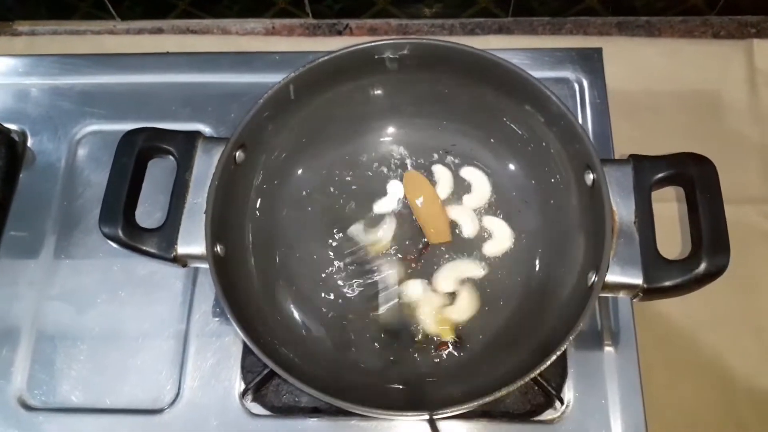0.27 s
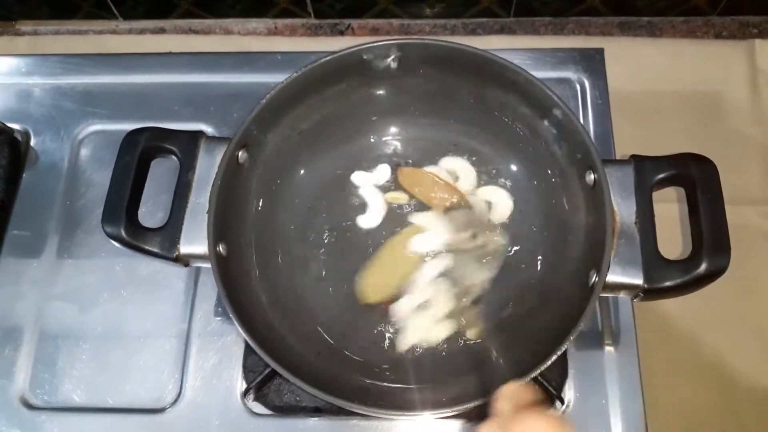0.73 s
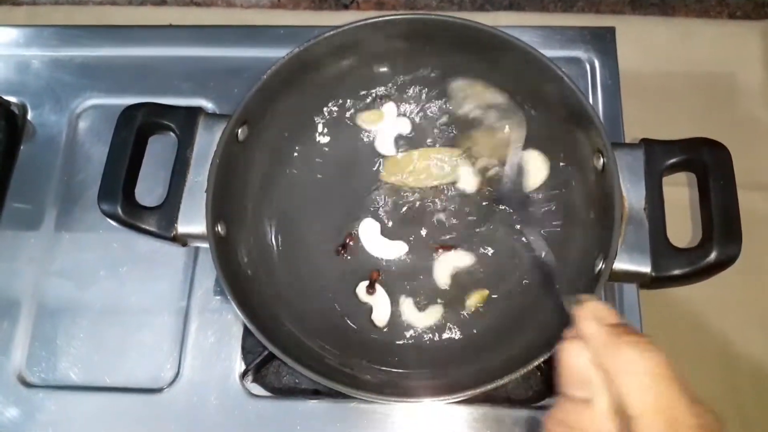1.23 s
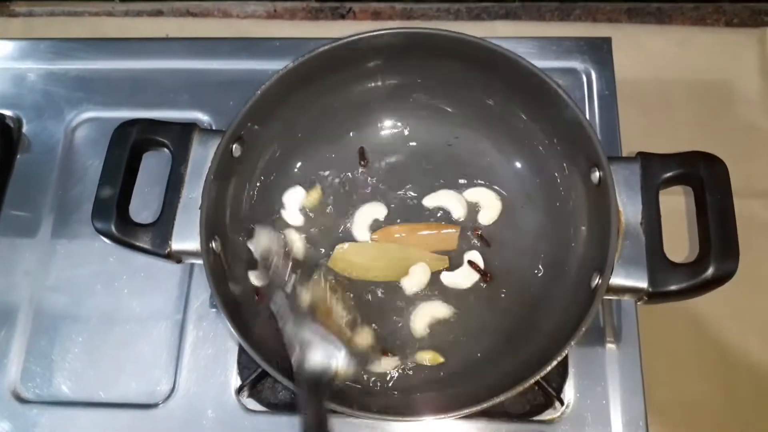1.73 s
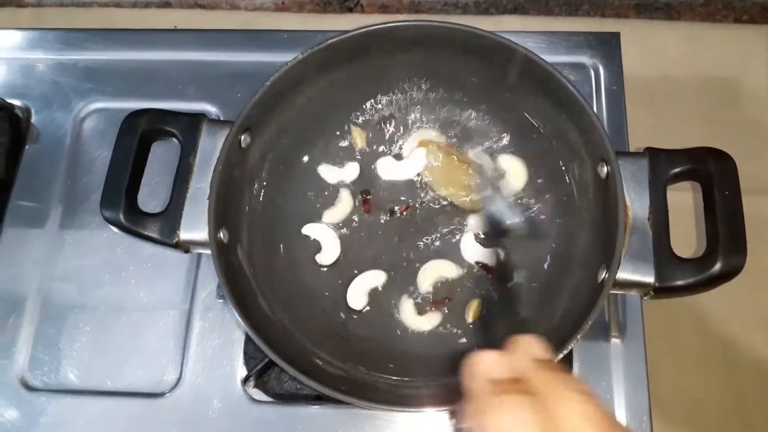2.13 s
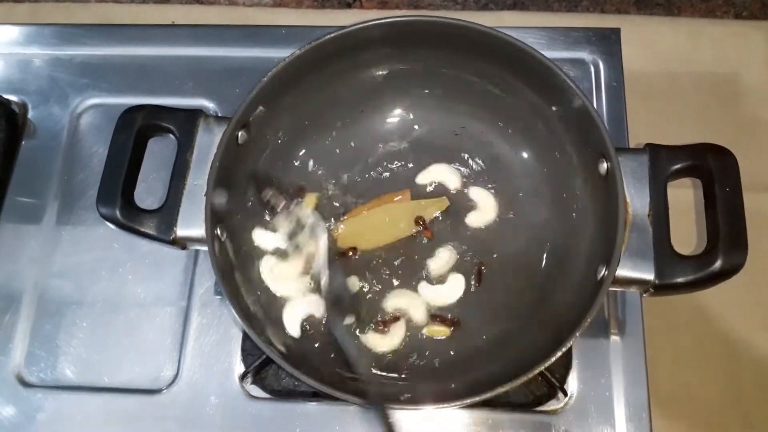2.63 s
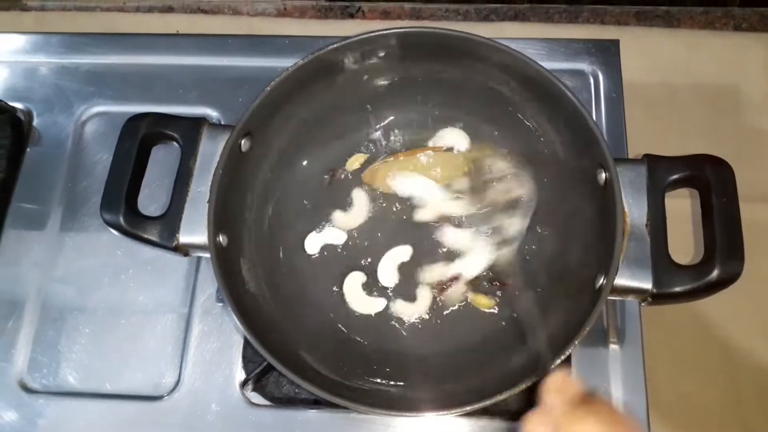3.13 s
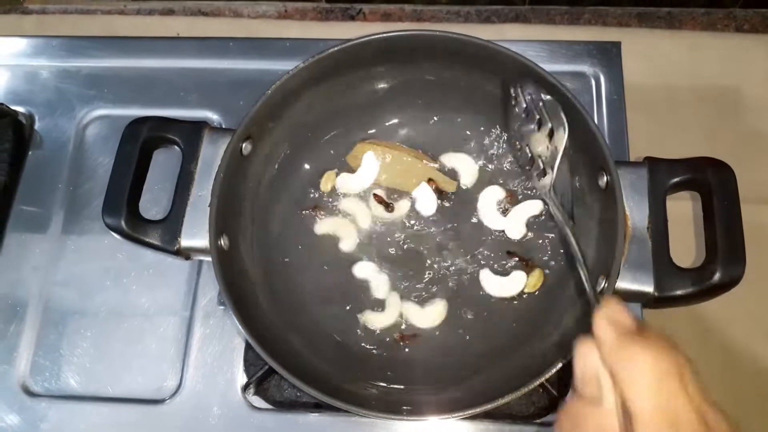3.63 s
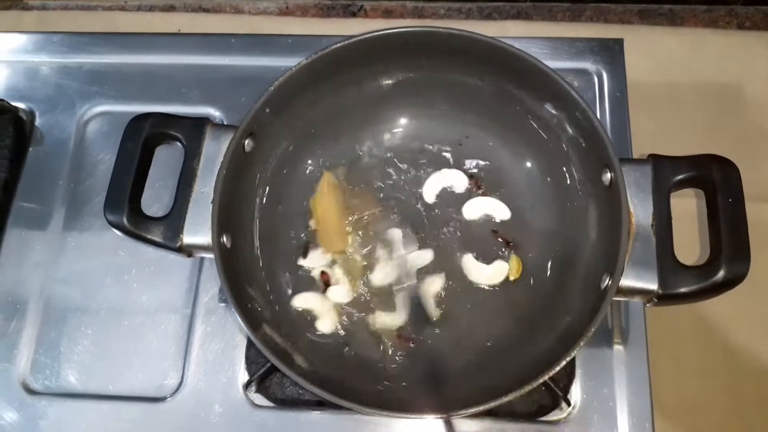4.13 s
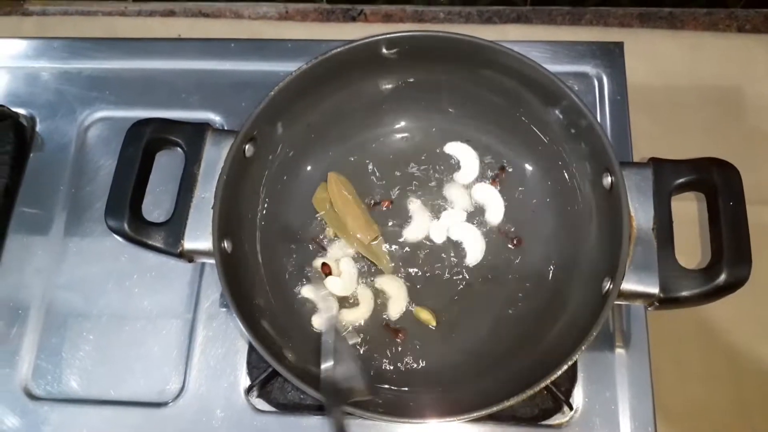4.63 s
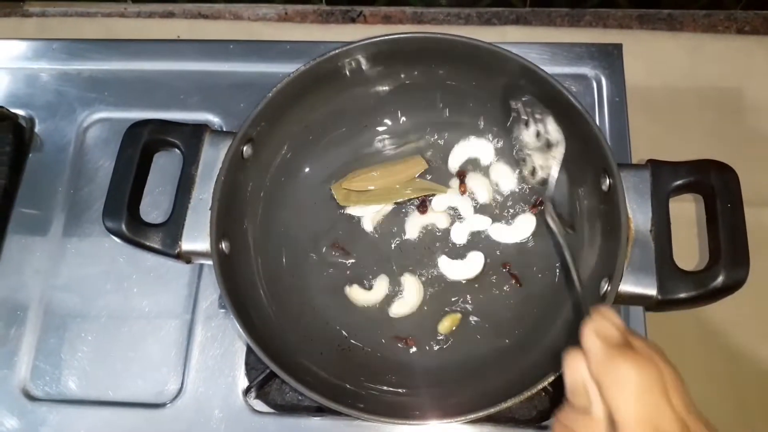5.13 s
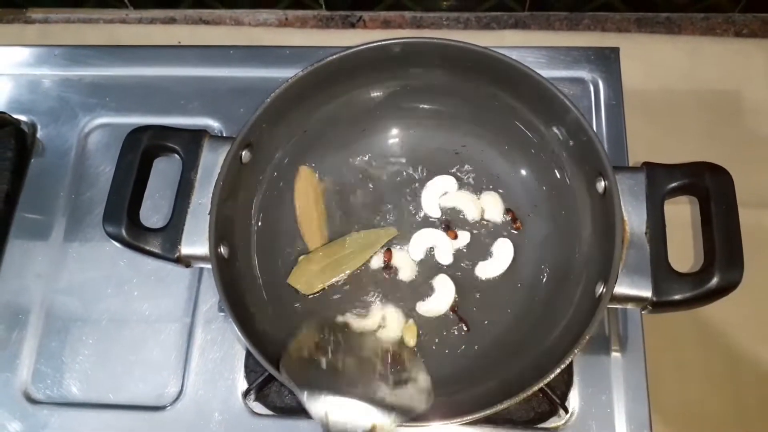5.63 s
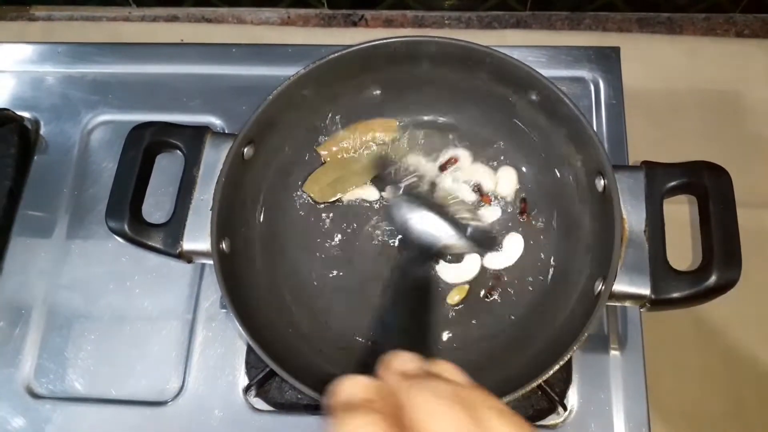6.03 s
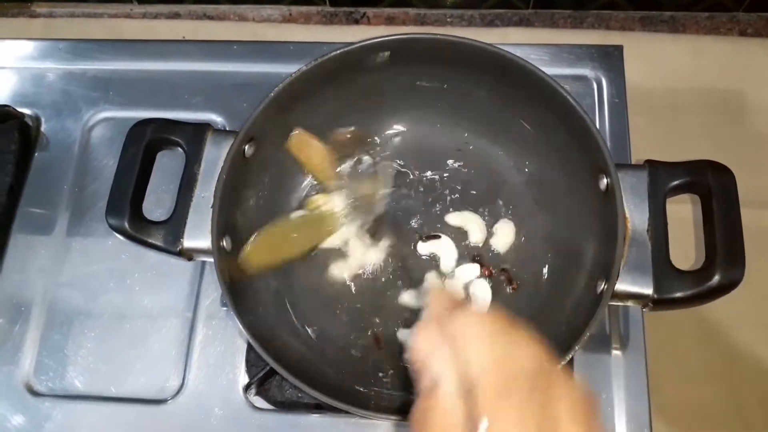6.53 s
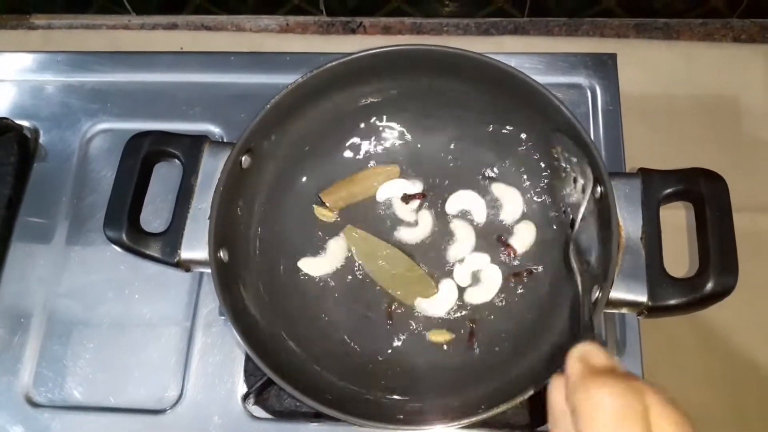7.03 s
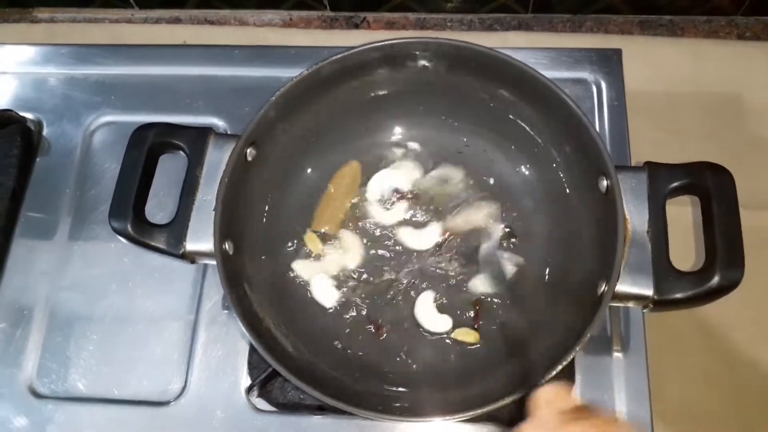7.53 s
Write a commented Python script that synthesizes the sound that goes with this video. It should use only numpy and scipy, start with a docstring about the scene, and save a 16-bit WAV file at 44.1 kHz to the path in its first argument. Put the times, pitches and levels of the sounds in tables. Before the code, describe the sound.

Close up in a kitchen with a short echo, hot oil crackles and spits in a metal pan of nuts and spices. From the start, a steel spatula clinks and clatters irregularly against the pan, sliding with a faint low hum and making the frying surge. A few short rasping scrapes join from about three seconds on. Everything is heard on the right, with the left almost silent.

```python
"""In a hard-walled kitchen, cashews and whole spices fry in a film of hot oil in a metal pan.
Bursting steam bubbles ring as damped resonators: short pitched pops over a fine fizz. Now and then
a drop spits with a sharp crack. A steel spatula stirs: its impacts excite the normal modes of pan
and blade, its friction makes them rasp and hum, and each push makes the boiling flare up.
All this sounds in the right channel; the left carries only faint electronic hiss."""
import sys
import numpy as np
from scipy import signal
from scipy.fft import rfft, irfft, next_fast_len
from scipy.io import wavfile
from scipy.ndimage import uniform_filter1d, map_coordinates

SR = 44100
rng = np.random.default_rng(int(sys.argv[2]) if len(sys.argv) > 2 else 0)


def int16_out(signal):
    """Quantize to a 16-bit WAV file."""
    q = np.round(np.clip(np.atleast_2d(signal).T, -1, 1) * 32767)
    wavfile.write(sys.argv[1], SR, q.astype(np.int16))


N = 342657


def amp(db):
    """Amplitude ratio of a level in decibels."""
    return 10 ** (np.asarray(db) / 20)


def unit(x):
    """Normalisation to rms 1."""
    return x / np.sqrt(np.mean(x ** 2) + 1e-20)


def along(points, hz):
    """Interpolation of (frequency, value) points on a logarithmic frequency axis."""
    freqs, values = np.transpose(points)
    return np.interp(np.log(hz + 1), np.log(freqs + 1), values)


def wobble(rate):
    """Smooth random modulation: a spline through `rate` random values a second."""
    return map_coordinates(rng.standard_normal(int(N * rate / SR) + 4), [np.arange(N) * rate / SR])


def swell(start, hold, rise, fall):
    """Exponential growth to 1 at `start`, a plateau, then exponential decay."""
    t = np.arange(N) / SR - start
    return np.exp(np.minimum(t, 0) / rise - np.maximum(t - hold, 0) / fall)


def filtered(x, response):
    """Linear filtering: the spectrum of x times a frequency response."""
    size = next_fast_len(len(x) + 8192)
    return irfft(rfft(x, size) * response(np.fft.rfftfreq(size, 1 / SR)), size)[:len(x)]


def coloured(x, spectrum):
    """Spectral shaping by (frequency [Hz], level [dB]) points; rms 1."""
    return unit(filtered(x, lambda hz: amp(along(spectrum, hz))))


def dying_noise(spectrum, t60s):
    """Dense modes decay like noise, each frequency at its own rate; half a second, energy 1."""
    hz, t, spectrogram = signal.stft(rng.standard_normal(SR // 2), SR, nperseg=256)
    gain = amp(along(spectrum, hz)[:, None] - 60 * t / along(t60s, hz)[:, None])
    tail = signal.istft(spectrogram * gain, SR, nperseg=256)[1][:SR // 2]
    return tail / np.linalg.norm(tail)


def add(track, time, sound):
    """Superposition of a sound on the track at a time in seconds."""
    start = int(np.clip(round(time * SR), 0, N))
    track[start:start + len(sound)] += sound[:N - start]


def electronic_hiss():
    """Electronic noise: a faint, steady broadband floor."""
    spectrum = [(20, -3), (90, 6), (1000, -1), (5500, -4), (9000, -12), (13000, -4), (15500, -6)]
    return amp(-82) * coloured(rng.standard_normal(N), spectrum)


# Spectrum of the kitchen air: (frequency [Hz], relative level [dB])
AIR_SPECTRUM = [(25, 1), (80, 6), (170, 3), (600, 9.5), (2000, -9), (8000, 12), (15800, -20)]
def kitchen_air():
    """Ambient noise: a stationary hush."""
    return amp(-62) * coloured(rng.standard_normal(N), AIR_SPECTRUM)


# Reflections from the pan wall and two tiled walls: (delay [s], gain [dB])
REFLECTIONS = [(.0013, -8.5), (0.0129, -17), (0.0168, -19)]
# Spectrum of the diffuse tail: (frequency [Hz], relative level [dB])
TAIL_SPECTRUM = [(200, -2.5), (1500, 1.5), (3000, 4), (6000, -6.5), (14000, 5)]
# Reverberation time: (frequency [Hz], T60 [s])
TAIL_T60 = [(200, 0.13), (1500, 0.29), (6000, 0.25), (14000, 0.19)]
def reverberation(x):
    """Reflection: three short echoes sound along with a diffuse tail, drawn anew each quarter second."""
    out, step = np.zeros(N), SR // 4
    for delay, db in REFLECTIONS:
        add(out, delay, amp(db) * x)
    for start in range(0, N, step):
        tail = signal.fftconvolve(x[start:start + step], dying_noise(TAIL_SPECTRUM, TAIL_T60))
        add(out, start / SR + 0.002, tail)
    return out


# Normal modes of pan and spatula together: (frequency [Hz], relative level [dB], T60 [s])
METAL_MODES = [(171, -19, .5), (240, -6.5, .4), (275, 3.5, .47), (351, -1, .46), (470, -5, .15),
               (726, -7, .34), (828, 4, .18), (850, 7, .083), (966, -2, .28), (1545, -2, .43),
               (1658, -7, .63), (2330, -7, .42), (2400, -4.5, .36), (2600, -7, .3), (3167, -5, .47),
               (4105, -3, .34), (4950, -4, .25), (5510, -2, .35), (5935, 5, .34), (5985, -1, .37),
               (6402, 1, .42), (7040, -6, .43), (7110, 1, .32), (7690, -6.5, .53), (7811, -2, .42),
               (11238, -11, .3), (11717, -14, .25), (12400, -17, .22), (13000, -15, .25), (14646, -11, .23)]
def free_vibration(db, t, blur_hz=3, blur_share=0.0019, load_share=0.00177):
    """Damped modes ring at levels `db`; loading by the moving blade detunes them and makes them drift."""
    hz, _, t60 = np.transpose(METAL_MODES)[:, :, None]
    hz = hz * (1 + load_share * rng.standard_normal(hz.shape))
    linewidth = np.abs(blur_hz + blur_share * hz)
    phase_steps = rng.standard_normal((len(hz), len(t))) * np.sqrt(2 * np.pi * linewidth / SR)
    drift = uniform_filter1d(np.cumsum(phase_steps, axis=1), size=160, axis=1)
    phase = 2 * np.pi * (hz * t + rng.random(hz.shape)) + drift
    ring = np.sum(amp(db - 60 * t / t60) * np.sin(phase), axis=0)
    return ring / np.linalg.norm(ring)


def forced_vibration(width_hz, roll_hz):
    """Friction noise drives the modes as resonators, fading above roll_hz; rms 1."""
    def response(f):
        damping = 1j * f * width_hz
        resonances = sum((-1) ** k * amp(db) * damping / (hz * hz - f * f + damping)
                         for k, (hz, db, _) in enumerate(METAL_MODES))
        return resonances / (1 + (f / roll_hz) ** 2)
    return unit(filtered(rng.standard_normal(N), response))


# The blade sliding over the pan bottom: (time [s], hold [s], relative level [dB])
BLADE_SLIDES = [(0.0, 0.0071, -50.5), (0.684, 0.17, -60.5), (1.206, 0.086, -54), (1.814, 0.16, -54),
                (2.15, 0.13, -59), (2.738, .11, -53.5), (2.98, 0.16, -56.5), (3.425, 0.1, -49.5),
                (3.583, 0.27, -60.5), (4.112, 0.23, -57), (4.53, .12, -59.5), (4.88, 0.08, -59.5),
                (5.694, .17, -52.5), (6.073, 0.17, -60.5), (6.647, 0.18, -60), (6.966, 0.21, -60),
                (7.483, 0.023, -62), (7.665, 0.13, -51.5)]
def pan_hum(grip_s=0.016, release_s=0.054):
    """Sliding friction sustains the pan's low modes over a dull rumble."""
    spectrum = [(30, -21), (70, -7), (160, 9), (300, 2), (700, -1), (1500, -30), (5000, -52)]
    rumble = coloured(rng.standard_normal(N), spectrum)
    pressure = sum(amp(db) * swell(time, hold, grip_s, release_s) for time, hold, db in BLADE_SLIDES)
    return pressure * (amp(-2) * forced_vibration(width_hz=27, roll_hz=545) + amp(-8) * rumble)


# Spectrum of the rasp: (frequency [Hz], relative level [dB])
RASP_SPECTRUM = [(150, -32), (350, 1), (550, -12), (880, 8.5), (1500, 7), (3500, 4), (7300, 8), (9500, -10),
                 (15800, -13)]
# Spectrum of the squeal: (frequency [Hz], relative level [dB])
SQUEAL_SPECTRUM = [(2000, -36), (5000, -7), (7000, 5.5), (9500, -14), (12800, 6.5), (14300, -13),
                   (15800, -2)]
# Strokes of the edge: (time [s], duration [s], rasp [dB], squeal [dB], hollow pan tone [dB])
EDGE_STROKES = [(2.847, 0.12, -47.5, -29, -69), (3.055, 0.13, -47, -46, -52.5),
                (3.408, 0.054, -42.5, -49, -51.5), (5.168, 0.21, -43, -65, -46),
                (6.024, 0.13, -46, -46, -55.5), (6.89, 0.044, -75, -65, -85),
                (7.083, 0.08, -38.5, -60, -57)]
def scrapes():
    """Stick-slip friction: the edge catches on the metal in rough bursts and makes the pan sing."""
    out, t = np.zeros(N), np.arange(N) / SR
    rasp = coloured(rng.standard_normal(N), RASP_SPECTRUM)
    squeal = coloured(rng.standard_normal(N), SQUEAL_SPECTRUM)
    hollow = forced_vibration(width_hz=12, roll_hz=1400)
    grip = unit(amp(4 * wobble(rate=220)))
    for time, duration, rasp_db, squeal_db, hollow_db in EDGE_STROKES:
        progress = np.clip((t - time) / duration, 0, 1)
        stroke = np.sqrt(np.abs(np.sin(np.pi * progress)))
        friction = grip * (amp(rasp_db) * rasp + amp(squeal_db) * squeal)
        out += stroke * (friction + amp(hollow_db) * hollow)
    return out


# Clatter of the many weak modes: (frequency [Hz], relative level [dB])
CLATTER_SPECTRUM = [(80, -71), (200, 3), (500, -5), (850, 5.5), (1900, -1.5), (2500, 1.5), (3500, -1),
                    (5200, 3.5), (7700, -0.5), (8500, -5), (9800, -12), (11500, -3), (15800, -7)]
# Decay of the clatter: (frequency [Hz], T60 [s])
CLATTER_DECAY = [(200, 0.62), (1000, 0.39), (6000, 0.32), (14000, 0.2)]
# Bands of pan boom, pan clang, blade ring and blade shimmer: (lower edge [Hz], upper edge [Hz])
KNOCK_BANDS = [(100, 550), (550, 2800), (2800, 9000), (9000, 17000)]
# Spatula striking pan: (time [s], pan [dB], blade [dB], hardness [dB], favoured frequency [Hz],
# tone over clatter [dB], crack over clatter [dB])
IMPACTS = [(0.2191, -34.5, -26.5, 1, 1330, -0.5, -3), (0.591, -43.5, -23, 8, 6040, 6, -21),
           (0.607, -67, -31.5, 8, 7700, 17, -12), (1.029, -38.5, -27, -6, 5870, 0, -7),
           (1.382, -52.5, -28, 2, 7200, 7, 0), (1.395, -56, -34.5, 3, 7200, 1, 3),
           (1.433, -48, -31, 2.5, 6430, -2, -22), (1.958, -42, -31.5, -2, 880, -3, -2),
           (2.349, -42, -29.5, 1, 5500, -2, -6), (3.084, -50, -30.5, 5, 5740, 4, -14),
           (3.1, -58, -35.5, -1, 6230, -1, -2), (3.446, -48, -42, -5, 910, -9, 6.5),
           (3.747, -50, -43.5, -2, 860, -2.5, -0.5), (4.375, -47, -34, 3.5, 6040, -4.5, -23),
           (4.791, -47.5, -41, -19, 910, -3, 1.5), (4.815, -57.5, -32, -1, 7600, -9, -0.5),
           (5.179, -52, -33, -1, 4100, -4.5, -22), (5.287, -50.5, -39.5, -2, 920, -3.5, -20),
           (5.884, -40, -25, -7.5, 3180, -4.5, 2.5), (6.3551, -40.5, -25.5, 5.5, 5350, 1, -16),
           (7.051, -44.5, -34.5, 9.5, 6400, 0, 2.5), (7.068, -48, -27.5, 6, 7050, 9, -20),
           (7.4163, -37.5, -29.5, -8, 2460, -1, 3), (7.687, -48.5, -33, 3, 6450, -4.5, -3),
           (7.697, -47, -26.5, 9.5, 6850, 2.5, -3.5)]
def knocks(scatter_db=3, favour_db=7, favour_width=0.093, clang_db=7, shimmer_db=-12, clang_loss=0.27):
    """Impact excitation: each contact rings the modes, most of all those with an antinode under it."""
    out, t = np.zeros(N), np.arange(SR // 2) / SR
    hz, db, _ = np.transpose(METAL_MODES)[:, :, None]
    rise_s = [0.013, 0.0015, 0.00052, 0.00054]  # the heavy pan swells more slowly than the thin blade
    for time, pan_db, blade_db, hard_db, spot_hz, tone_db, crack_db in IMPACTS:
        favoured = favour_db * np.exp(-(np.log(hz / spot_hz) / favour_width) ** 2)
        ring = free_vibration(db + favoured + scatter_db * rng.standard_normal(hz.shape), t)
        crack = coloured(rng.standard_normal(len(t)) * np.exp(-t / 0.0018), CLATTER_SPECTRUM)
        clatter = dying_noise(CLATTER_SPECTRUM, CLATTER_DECAY)
        blow = clatter + amp(tone_db) * ring + amp(crack_db) * crack / np.linalg.norm(crack)
        # a hard hit with the thin edge moves the pan less than the flat does
        levels = [pan_db, pan_db + clang_db - clang_loss * hard_db,
                  blade_db, blade_db + shimmer_db + hard_db]
        for band, level, rise in zip(KNOCK_BANDS, levels, rise_s):
            bandpass = signal.butter(3, band, "band", fs=SR, output="sos")
            part = signal.sosfilt(bandpass, blow) * (1 - np.exp(-t / rise))
            add(out, time, amp(level) * part / np.std(part[:SR // 25]))
    return out


def bubbles(times, db, hz, lengths, rise=0.015):
    """Cavity resonance: each bursting bubble rings for a few cycles, its pitch rising as it opens."""
    t = np.arange(SR // 160) / SR
    age = 2 * t / np.maximum(lengths, 1e-4)[:, None]
    pitch = hz[:, None] * (1 + rise * (np.minimum(age, 4) - 1.5))
    envelope = amp(db)[:, None] * age * np.exp(1 - age)
    ring = envelope * np.sin(2 * np.pi * np.cumsum(pitch, axis=1) / SR)
    samples = (np.abs(times) * SR).astype(int)[:, None] + np.arange(len(t))
    return np.bincount(samples.ravel(), ring.ravel(), N)[:N]


def swarm(count, hz, octaves, cycles, spread_db, ceiling_hz=7600):
    """A random point process: many bubbles burst independently, a few much louder than the rest."""
    when, size_rank, pitch_rank = rng.random((count, 3)).T
    pitch = hz * 2 ** (octaves * np.log((pitch_rank + 1e-4) / (1.0001 - pitch_rank)) / 2)
    # surface tension sets a smallest size, hence a highest pitch
    pitch = np.maximum(pitch / (1 + (pitch / ceiling_hz) ** 4) ** (1 / 4), 500)
    size_db = spread_db * np.minimum(-np.log(1 - size_rank), 3.5)
    return bubbles(when * N / SR, size_db, pitch, cycles / pitch)


# Simmer of the undisturbed oil: (time [s], level [dB])
SIMMER_LEVELS = [(0.0, -34), (0.45, -39), (0.95, -37.5), (1.7, -41), (2.7, -42.5), (2.95, -39),
                 (3.3, -46.5), (3.55, -43.5), (3.74, -49.5), (4.1, -38.5), (4.55, -43.5), (5.55, -41.5),
                 (5.78, -47), (6.33, -52), (6.65, -47), (6.95, -44.5), (7.3, -42.5), (7.77, -44.5)]
# Pushes that turn wet nuts onto hot metal: (time [s], hold [s], big bubbles [dB], fizz [dB])
PUSHES = [(0.01, 0.016, -35.5, -37.5), (0.393, 0.024, -38.5, -57), (0.534, 0.29, -35, -41.5),
          (1.344, 0.05, -38.5, -45), (1.76, 0.026, -41, -38), (2.07, .04, -42.5, -50),
          (2.483, 0.054, -38.5, -41), (2.988, .07, -39.5, -38.5), (3.42, 0.18, -47, -43.5),
          (3.87, 0.034, -39.5, -37), (4.639, 0.032, -34.5, -45), (5.125, 0.35, -43, -43.5),
          (6.01, 0.017, -41.5, -47), (6.48, 0.17, -38.5, -39.5), (7.21, 0.049, -43.5, -53)]
def boiling_gains(resting_boil_db=-12, flare_s=0.054, settle_s=0.12):
    """Incoherent sources add in power: simmer plus flares give the gains of big bubbles and fizz."""
    times, levels = np.transpose(SIMMER_LEVELS)
    simmer = amp(np.interp(np.arange(N) / SR, times, levels))
    boil_power, fizz_power = (amp(resting_boil_db) * simmer) ** 2, simmer ** 2
    for time, hold, boil_db, fizz_db in PUSHES:
        flare = swell(time, hold, flare_s, settle_s)
        boil_power += (amp(boil_db) * flare) ** 2
        fizz_power += (amp(fizz_db) * flare) ** 2
    return np.sqrt(boil_power), np.sqrt(fizz_power)


# Colouring of the big bubbles: (frequency [Hz], relative gain [dB])
BOIL_COLOUR = [(200, -15), (550, 9.5), (900, 4.5), (1700, 4), (2700, 10), (4500, 18.5), (9000, -27)]
# Colouring of the fine fizz: (frequency [Hz], relative gain [dB])
FIZZ_COLOUR = [(300, 4), (1000, -21), (2500, -2.5), (4500, -8.5), (7300, 5.5), (8500, 0.5), (9800, -15.5),
               (12000, -5.5), (15800, -13)]
def frying():
    """Vaporisation: water boils out of the nuts as big bubbles, fine fizz and a patter of small pops."""
    boil_gain, fizz_gain = boiling_gains()
    boil = coloured(swarm(count=3500, hz=1723, octaves=0.55, cycles=1.27, spread_db=6), BOIL_COLOUR)
    fizz = coloured(swarm(count=4500, hz=5500, octaves=0.572, cycles=3.8, spread_db=5), FIZZ_COLOUR)
    mist = coloured(rng.standard_normal(N) * amp(8.3 * wobble(rate=400)), FIZZ_COLOUR)
    patter = unit(swarm(count=380, hz=5700, octaves=0.39, cycles=2.14, spread_db=2.5))
    sizzle = amp(-7) * fizz + amp(-7.5) * mist + amp(-6) * patter
    return boil_gain * amp(-7.5) * boil + fizz_gain * sizzle


# Colouring of a drop's crack: (frequency [Hz], gain [dB])
CRACK_COLOUR = [(200, -26), (550, -3), (900, -6.5), (7000, 6.5), (10000, -5.5), (15800, -4.5)]
# Spitting drops of oil: (time [s], relative level [dB])
DROPS = [(0.131, -12.5), (.357, -11), (.49, -11.5), (.661, -11), (1.184, -21), (1.224, -14), (1.573, -17),
         (2.58, -11.5), (2.751, -8), (2.864, -12), (3.287, -14), (3.45, -17), (3.847, -11.5), (4.716, -24),
         (5.012, -15), (5.0625, -7), (5.286, -5), (6.0575, -12), (6.09, -8), (6.587, -27), (7.354, -19),
         (7.404, -20)]
def spits(spray_db=-14):
    """An impulse is broadband: an exploding drop gives one pressure spike, then a trace of spray."""
    out, t = np.zeros(N), np.arange(SR // 200) / SR
    spike = t == 0
    for time, db in DROPS:
        spray = amp(spray_db) * rng.standard_normal(len(t)) * np.exp(-t / 0.0013)
        add(out, time, amp(db + 2) * (spike + spray))
    return filtered(out, lambda f: amp(along(CRACK_COLOUR, f)))


# Colouring of the tearing oil film: (frequency [Hz], gain [dB])
TICK_COLOUR = [(200, -20), (550, -2), (850, 6), (3000, 4), (7300, 4), (9500, -7), (15800, -3)]
# The loudest bursting bubbles: (time [s], relative level [dB], frequency [Hz], nominal length [s])
LOUD_BUBBLES = [(0.038, -16.5, 3130, 0.001), (.098, -14, 4270, 0.00065), (0.129, -24, 6200, .0005),
                (.152, -16, 5700, 0.0015), (0.389, -13.5, 4180, 0.00047), (.405, -18, 2000, 0.0012),
                (0.468, -20, 1470, 0.00093), (.566, -26.5, 2220, .003), (0.569, -14.5, 6460, .0005),
                (.661, -21, 6200, .0005), (.662, -19, 1360, 0.0014), (.726, -17.5, 1530, 0.00097),
                (0.727, -17, 4950, .0009), (0.756, -22.5, 3780, .0015), (.769, -12.5, 6290, .0005),
                (.777, -20.5, 1610, 0.0026), (0.805, -12, 5400, 0.00052), (0.843, -17.5, 1800, 0.00087),
                (0.874, -16.5, 4200, .0005), (.892, -19, 4470, 0.0005), (1.004, -21.5, 4220, .0016),
                (1.037, -14, 4780, 0.00087), (1.131, -20.5, 1690, 0.00057), (1.225, -16.5, 1700, 0.00075),
                (1.247, -14.5, 6400, .0005), (1.304, -19.5, 1450, 0.00055), (1.419, -22, 1790, 0.0013),
                (1.699, -22, 1180, 0.00095), (1.772, -18.5, 6650, .0005), (1.902, -16, 6030, 0.00091),
                (1.941, -18, 4930, .0005), (2.033, -19.5, 1500, 0.00069), (2.18, -21, 5100, .0004),
                (2.242, -24, 4400, 0.0013), (2.287, -16, 4470, .0005), (2.48, -18, 5540, 0.00045),
                (2.59, -23, 5070, .0009), (2.652, -30, 2020, 0.0011), (2.712, -18, 4900, .0005),
                (2.779, -22.5, 5000, .0008), (2.882, -15.5, 4300, 0.00064), (2.97, -14, 6660, 0.00045),
                (3.014, -17, 5200, 0.00034), (3.173, -25, 4040, 0.0018), (3.287, -23.5, 1910, 0.00039),
                (3.381, -20, 3760, 0.00045), (3.494, -23, 5020, 0.0019), (3.596, -28.5, 3200, 0.0019),
                (3.637, -22.5, 5210, 0.0009), (3.845, -19.5, 2520, 0.001), (3.905, -26, 1540, 0.0012),
                (4.017, -23, 3170, 0.0015), (4.133, -18.5, 5400, .0005), (4.141, -17, 4600, .0007),
                (4.314, -19, 2960, 0.00088), (4.315, -14.5, 6240, 0.00054), (4.412, -24.5, 5440, .0009),
                (4.462, -19, 5830, 0.00067), (4.565, -17.5, 920, 0.0012), (4.58, -31, 1380, 0.0043),
                (4.63, -20.5, 1510, 0.0015), (4.643, -28.5, 1620, 0.0051), (4.721, -24.5, 4100, 0.0014),
                (4.899, -15.5, 5130, 0.00063), (4.997, -23, 4580, 0.00069), (5.129, -20, 3560, 0.0011),
                (5.137, -27.5, 1000, 0.0013), (5.285, -17, 5470, .0005), (5.469, -24, 2520, 0.0012),
                (5.498, -13.5, 6790, 0.0006), (5.559, -16.5, 4380, 0.0005), (5.637, -16.5, 5140, 0.0011),
                (5.93, -20, 5900, .0005), (5.946, -13, 6300, .0009), (6.003, -24, 2860, 0.0017),
                (6.049, -24.5, 1750, .0011), (6.079, -16, 6190, 0.00055), (6.097, -24, 1720, 0.0017),
                (6.225, -31, 1020, 0.0011), (6.226, -19.5, 5060, .0008), (6.446, -13.5, 4830, 0.00043),
                (6.499, -18, 1470, 0.00052), (6.513, -20, 3040, 0.0015), (6.662, -12.5, 4800, 0.00044),
                (6.771, -22, 6400, .0005), (6.805, -25, 3000, .0012), (7.041, -28, 1060, 0.00058),
                (7.042, -22, 6500, .0004), (7.087, -16, 6800, .0005), (7.197, -31.5, 990, 0.0035),
                (7.255, -26.5, 3120, 0.0011), (7.527, -21, 5050, .0005)]
def pops(tick_db=-19, shortest_s=0.00055):
    """Film rupture: the oil tears with a faint broadband tick, and the opened cavity resonates."""
    times, db, hz, lengths = np.transpose(LOUD_BUBBLES)
    ticks, t = np.zeros(N), np.arange(SR // 200) / SR
    for time, level in zip(times, db):
        add(ticks, time, amp(level + tick_db) * np.exp(-t / 0.001) * rng.standard_normal(len(t)))
    notes = bubbles(times, db, hz, np.maximum(lengths, shortest_s))
    return notes + filtered(ticks, lambda f: amp(along(TICK_COLOUR, f)))


def scene(oil_cut_hz=560):
    """Superposition: oil, spatula and room sum in the right channel; the left is hiss alone."""
    highpass = signal.butter(3, oil_cut_hz, "high", fs=SR, output="sos")  # small bubbles radiate no bass
    oil = signal.sosfilt(highpass, frying() + pops() + spits())
    spatula = knocks() + scrapes()
    air = kitchen_air()
    hum = pan_hum()
    room = reverberation(amp(-1.5) * oil + amp(-14.5) * spatula)
    return np.array([electronic_hiss(), amp(5.5) * (oil + spatula + hum + room + air)])


def record(dry, ceiling=0.8, top_hz=15900):
    """Soft saturation rounds the tallest spikes; band limiting removes everything above top_hz."""
    rounded = dry / (1 + np.abs(dry / ceiling) ** 6) ** (1 / 6)
    return np.array([filtered(channel, lambda hz: hz < top_hz) for channel in rounded])


dry = scene()
out = record(dry)
int16_out(out)
```